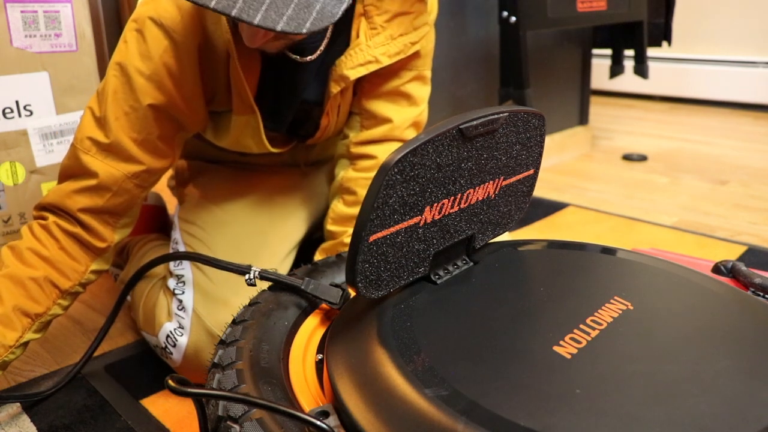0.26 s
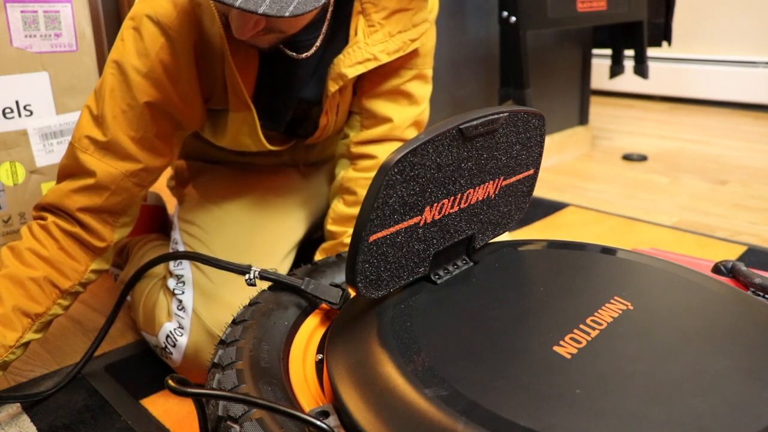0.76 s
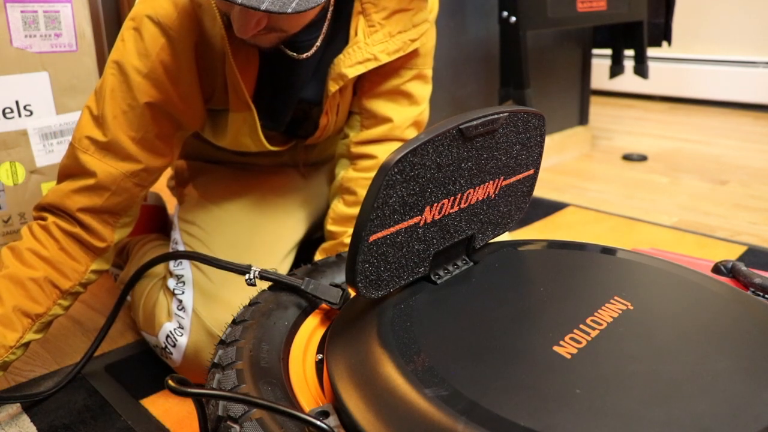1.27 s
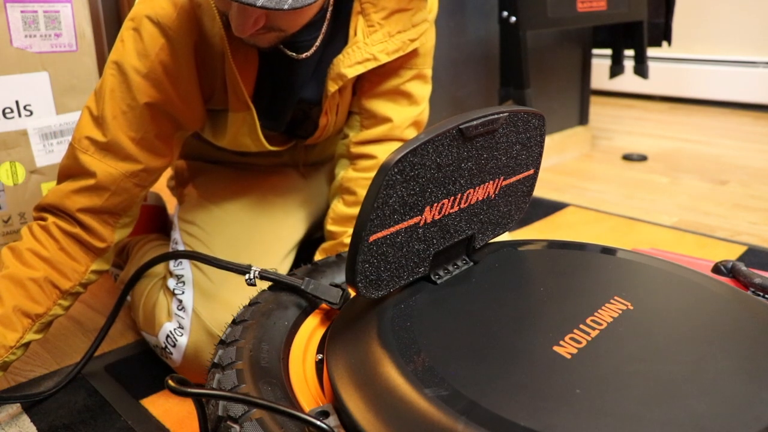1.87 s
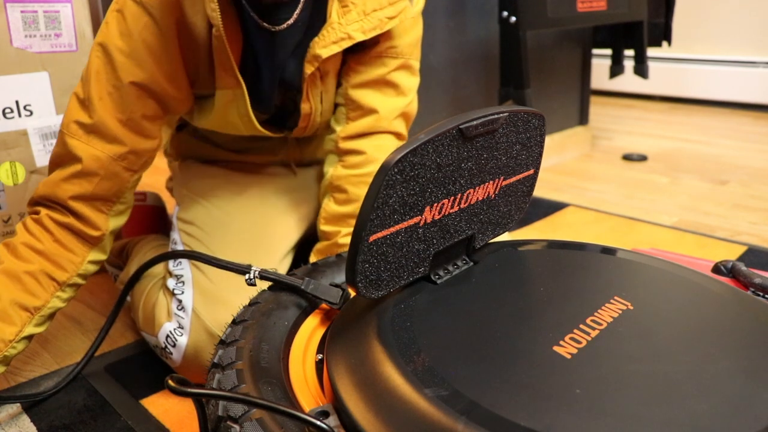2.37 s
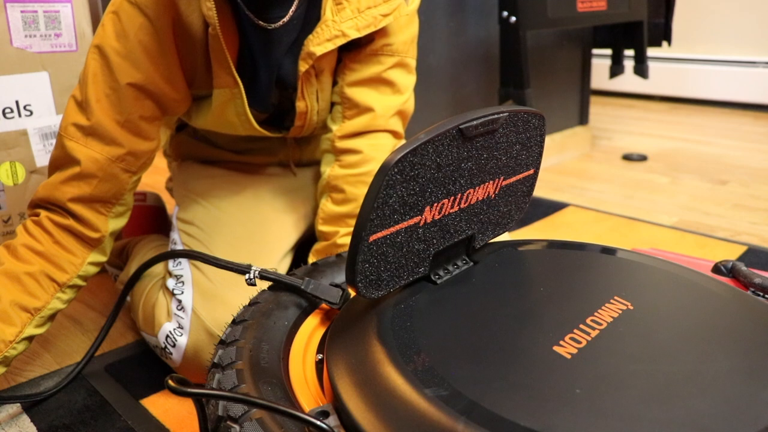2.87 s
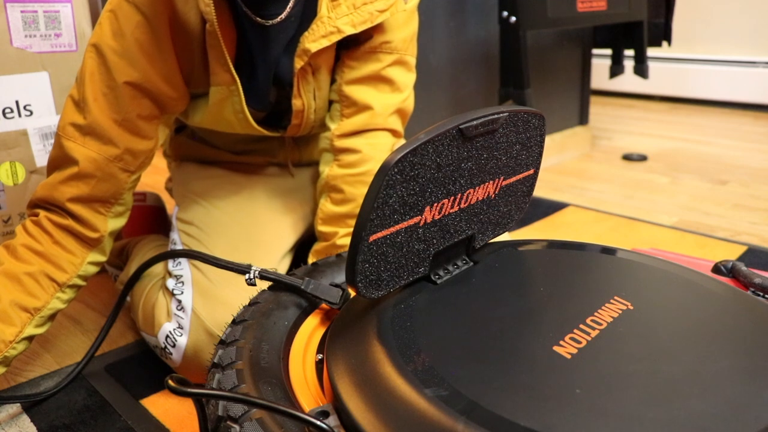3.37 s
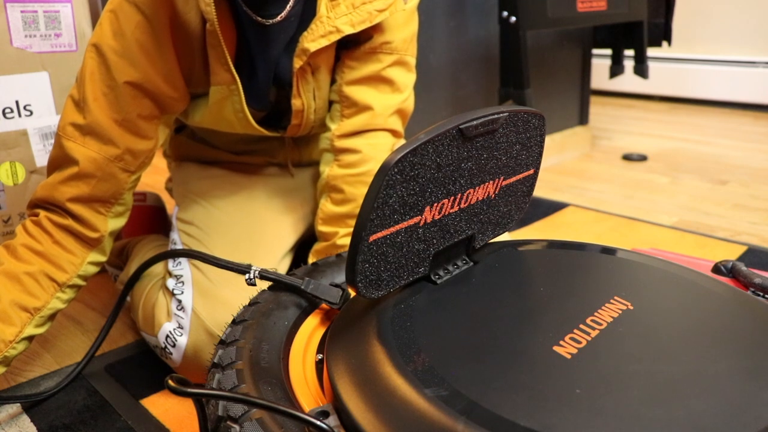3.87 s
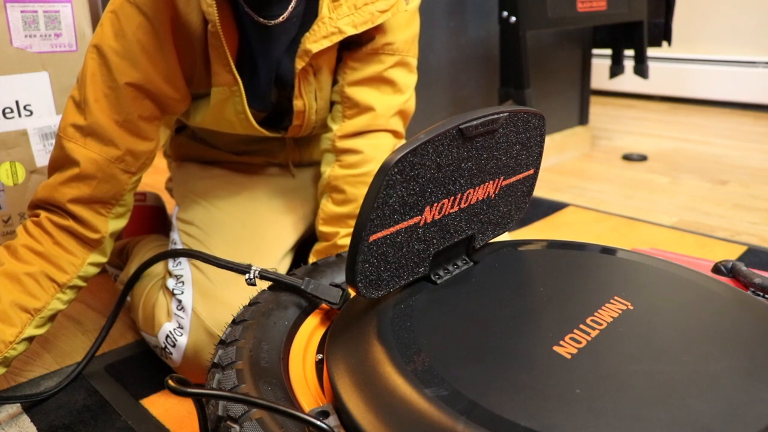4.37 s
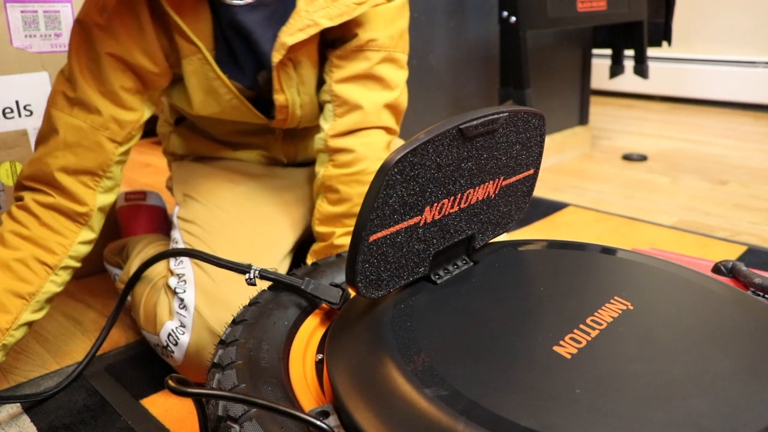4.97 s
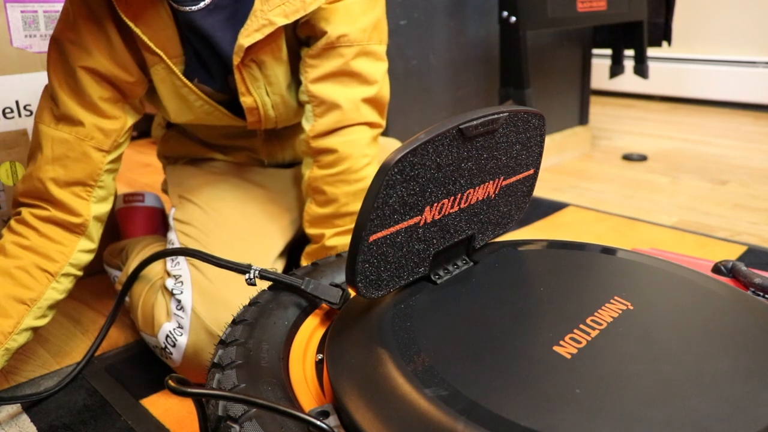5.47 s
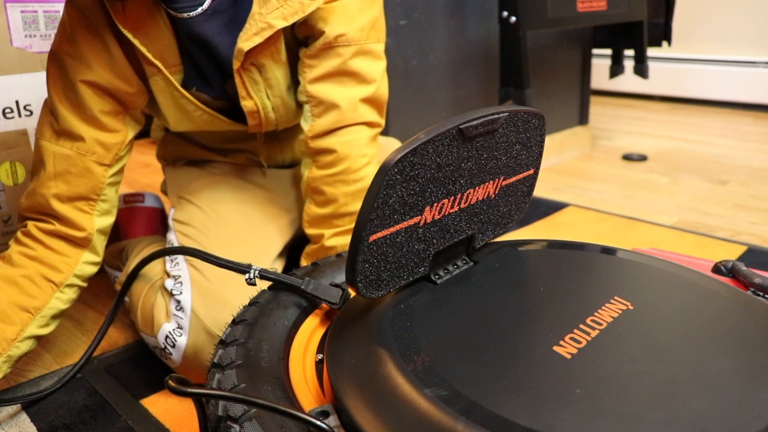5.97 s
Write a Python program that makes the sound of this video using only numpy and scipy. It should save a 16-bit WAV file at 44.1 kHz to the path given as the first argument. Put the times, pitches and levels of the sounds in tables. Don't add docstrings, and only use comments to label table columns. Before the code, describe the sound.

Steady mechanical droning from a compact tyre inflator, heard close and fairly dry indoors. About a hundred strokes a second blend into a rough buzz, strongest in the middle range, with a bright ticking and airy fizz on top. The pitch sinks almost imperceptibly as pressure builds. Low hum rises after two seconds, flutters around five seconds, then fades away while the buzzing carries on to the end.

```python
import sys
import numpy as np
from scipy import signal
from scipy.fft import rfft, irfft, next_fast_len
from scipy.io import wavfile
from scipy.ndimage import uniform_filter1d, map_coordinates

SR = 44100
rng = np.random.default_rng(int(sys.argv[2]) if len(sys.argv) > 2 else 0)


def rack_gain(trim_db):
    fader = np.asarray(trim_db, float)
    return 10 ** (fader / 20)


def unload_wav(signal):
    wavfile.write(
        sys.argv[1],
        SR,
        np.round(np.clip(np.atleast_2d(signal).T, -1, 1) * 32767).astype(np.int16),
    )


N = 273861
RIPPLE_HZ = 240


def unit(x):
    return x / np.sqrt(np.mean(x ** 2) + 1e-20)


def curves(rows):
    s, *cols = np.transpose(rows)
    return [np.interp(np.arange(N) / SR, s, c) for c in cols]


def wobble(rate):
    knots = rng.standard_normal(int(N * rate / SR) + 4)
    return map_coordinates(knots, [np.arange(N) * rate / SR])


def filling(half_db, rise_db, bend_db=0):
    fill = np.linspace(-1, 1, N)
    return rack_gain(fill_curve(half_db, rise_db, bend_db, fill))


def fill_curve(half, rise, bend, fill):
    return half + rise * fill + bend * fill ** 2


def filtered(x, response):
    m = next_fast_len(N + 8192)
    return irfft(rfft(x, m) * response(np.fft.rfftfreq(m, 1 / SR)), m)[:N]


def ringing(x, modes):
    def body(f):
        total = 0
        for k, (centre, width, db) in enumerate(modes):
            damping = 1j * f * width
            total = total + (-1) ** k * rack_gain(db) * damping / (centre * centre - f * f + damping)
        return total
    return unit(filtered(x, body))


def noise(spectrum):
    f, db = np.transpose(spectrum)

    def colour(hz):
        return rack_gain(np.interp(np.log(hz + 1), np.log(f + 1), db, right=-120))
    return unit(filtered(rng.standard_normal(N), colour))


def strikes(turns, at, sizes):
    where = np.interp(np.arange(len(sizes)) + at, turns, np.arange(N), right=N + 20)
    taps = np.floor(where)[:, None] + np.arange(-7, 9)
    off = taps - where[:, None]
    shape = np.sinc(off) * np.cos(np.pi * off / 16) ** 2 * sizes[:, None]
    return np.bincount(np.clip(taps, 0, N).astype(int).ravel(), shape.ravel(), N + 1)[:N]


# t/s, crank turns f/Hz
CRANK_SPEED = [(0, 102.99), (.55, 102.74), (1.05, 102.64), (1.4, 102.38), (1.85, 102.3), (2.4, 101.95),
               (3.05, 101.9), (3.4, 101.67), (4, 101.64), (4.8, 101.2), (5.4, 101.05), (6.21, 101.07)]


def crank():
    return np.cumsum(curves(CRANK_SPEED)[0] + 0.012 * wobble(6)) / SR


# cycles per stroke, level/dB
GEARS = [
    (0.4, 4),
    (0.16, -15.5),
    (0.25, -13),
]


def mesh(turns):
    k = np.arange(int(turns[-1]) + 2)
    ripple = np.sin(2 * np.pi * RIPPLE_HZ * np.interp(k, turns, np.arange(N) / SR))
    gears = 0
    for cycles, db in GEARS:
        drift = np.cumsum(rng.normal(0, 0.026, len(k))) + rng.uniform(0, 6.5)
        gears = gears + rack_gain(db) * np.sin(2 * np.pi * cycles * k + drift)
    return unit(ripple + rack_gain(-11.5) * gears)


def twisted(turns, gear):
    shiver = wobble(40)
    play = shiver - uniform_filter1d(shiver, size=3000)
    return turns + 0.0012 * map_coordinates(gear, [turns]) + 0.00068 * play


SPEAKS = [(1, 1.408, -0.042), (3, -0.005, 0.046), (5, 1.232, -0.016), (7, 0.922, 0.006), (9, 0.683, -0.079),
          (11, 0.05, 0.081), (14, -0.11, -0.043), (16, -0.268, 0.047), (19, -0.057, -0.023),
          (23, 1.115, -0.022), (25, 0.418, -0.032), (27, 1.03, 0.097), (29, 0.84, -0.013),
          (31, 0.952, -0.196), (34, 1.232, 0.163), (36, 0.682, 0.081), (41, 0.641, -0.037),
          (44, 0.961, -0.151)]
# crank order, free level/dB, rise to full/dB, added level pressed to the floor/dB, power of press
FEET = [(1, -61, 0, -62.5, .7), (2, -55.5, 1, -54.5, 1.5), (3, -53.5, 1, -55.5, 0.69),
        (4, -73, 0, -55, 1.1)]
# crank order, level at half fill/dB, rise to full/dB, bend at both ends/dB,
# change under a leaning body/dB
BODY = [(5, -54.0, -0.5, -0.5, 1.5), (6, -37.0, 1.0, -0.5, 0.5), (7, -42, 2.5, -0.5, -1),
        (8, -51.5, -4.5, -4.5, 0.5), (9, -50.5, 3.0, 0.5, 1.0), (10, -39.5, -1.5, -1.0, 0.0),
        (11, -48.5, 1.5, -1.5, 0.0), (12, -60.5, -1, 8, -8.0), (13, -59, -4, -0.5, 4.5),
        (14, -47.5, 1.5, -1.5, 1.0), (15, -46, -0.5, -3, 0.5), (16, -52.0, 0.0, 2, 0.5),
        (17, -54.5, -2, -9, -0.5), (18, -64, -4, 3, 0.5), (19, -60, -6.5, -3.5, -11),
        (20, -54, 1, -5.5, -3), (21, -64, 9, -0.5, 4), (22, -66, 3.5, 0, 2), (23, -58.0, -0.5, -2, 2),
        (24, -50.5, 0, 3, -1), (25, -56, 3, 4, 6),
        (26, -45.5, -1, 2.5, 1), (27, -51, -2, 3.5, 3.0), (28, -44, 4, 2.5, 4.5), (29, -47, -1, 2.0, -7.5),
        (30, -49.0, 9.5, -17, -3.5), (31, -55, 3, -1.5, 6.5), (32, -57.5, 6, 5, -1),
        (33, -62.5, 5, 1.5, 2.5), (34, -53.5, -3.5, -6, -5), (35, -54.0, 3, -0.5, 0),
        (36, -58.5, 5, -1, 0.5), (37, -70.5, 0.5, 9, 1), (38, -62.5, 2.0, 1.5, -5), (39, -71, -6, -4, -4.5),
        (40, -58.5, -2, -14, -8), (41, -69.5, 0, 11.0, 2.5), (42, -59, -1, 0.5, -11),
        (43, -58, 2.5, -3.5, -7.5), (44, -78, 9, 11.0, 7), (45, -68.5, -0.5, 5.0, 3.5),
        (46, -85, 3, -5, -5)]
# t/s, pressure [0-1]
PRESS = [(0, 0.12), (1, .1), (1.6, 0.02), (2.1, 0.03), (2.3, 0.75), (3, 0.83), (4.78, 1.07), (4.88, 0.2),
         (4.94, 0.2), (5.02, .75), (5.1, 0.6), (5.2, .85), (5.32, 0.54), (5.55, 0.6), (5.74, 0.3),
         (5.86, 0.06), (6.05, 0), (6.21, 0)]
# t/s, lean [0-1]
LEAN = [
    (0, 0),
    (2, 0),
    (3.5, 0.97),
    (4, 0.73),
    (5.2, 0.08),
    (6.21, 0),
]


def casing(turns):
    press = np.clip(curves(PRESS)[0], 0, None)
    lean, = curves(LEAN)
    sizes = []
    for _, free_db, rise_db, floor_db, power in FEET:
        sizes.append(filling(free_db, rise_db) + press ** power * rack_gain(floor_db))
    for _, half_db, rise_db, bend_db, lean_db in BODY:
        sizes.append(filling(half_db, rise_db, bend_db) * rack_gain(lean_db * lean))
    order, *delays = np.transpose(SPEAKS)
    k = np.arange(len(sizes)) + 1
    lag, shift = [np.cumsum(np.interp(k, order, d)) for d in delays]
    fill = np.linspace(-1, 1, N)
    stroke = 0
    for n, size, late, more in zip(k, sizes, lag, shift):
        phase = n * turns - fill_curve(late, more, 0, fill)
        stroke = stroke + size * np.sqrt(2) * np.cos(2 * np.pi * phase)
    return stroke


# f/Hz, width f/Hz, level/dB
SHELL = [(247.5, 160, -24), (653, 92, -2), (1020, 88, -3.5), (1380, 180, -31), (1670, 63, -0.5),
         (2000, 250, -13), (2753, 340, 3.5), (3360, 420, -2.5), (4360, 81, -14.5)]


def chatter(turns, gear, gear_db=-51, loose_db=-56):
    scatter = rng.standard_normal((len(gear), 2))
    steady = strikes(turns, .8, gear) + 0.37 * strikes(turns, .58, np.roll(gear, 1))
    loose = strikes(turns, .86, scatter[:, 0]) + 1.3 * strikes(turns, .45, scatter[:, 1])
    knocks = rack_gain(gear_db) * ringing(steady, SHELL) + rack_gain(loose_db) * ringing(loose, SHELL)
    return filling(-3.5, 2.5, 2) * knocks


# f/Hz, width f/Hz, level/dB
SEAT_LOW = [(5080, 490, -8), (6800, 650, -6), (9300, 540, 2.5), (10050, 710, 1.5), (11500, 1300, -7),
            (14500, 1600, -24)]
# f/Hz, width f/Hz, level/dB
SEAT_UP = [(5320, 380, -7.5), (6650, 470, -4.5), (9350, 270, 5), (10000, 450, 2), (10930, 580, -3.5),
           (12100, 880, -14)]
# f/Hz, level/dB per Hz
AIR = [(3000, -26), (4200, -9.5), (4800, -8), (5300, -13), (5900, -12), (6500, -5.5), (7600, -11),
       (8500, -5), (9700, -8.5), (11000, -16), (12200, -4), (13200, -15), (14600, -7), (15700, -11.5)]
# t/s, uprightness [0-1]
UPRIGHT = [
    (0, 0),
    (2.05, 0),
    (2.35, .8),
    (4.8, 1),
    (5.3, 0.86),
    (6.21, 1),
]


def valve(turns, gear):
    chance = rng.standard_normal((len(gear), 7))
    at = .975 + .002 * gear + 0.0015 * chance[:, 0]
    side_size = rack_gain(2.5 * chance[:, 3])
    blows = strikes(turns, at, rack_gain(0.62 * chance[:, 1]))
    blows += 0.2 * strikes(turns, at + 0.0307 + 0.0028 * chance[:, 6], rack_gain(1.5 * chance[:, 5]))
    blows += 0.31 * strikes(turns, at + .12 + .012 * chance[:, 2], side_size)
    blows += 0.27 * strikes(turns, at - .13 + .04 * chance[:, 4], side_size)
    up, = curves(UPRIGHT)
    tick = (1 - up) * ringing(blows, SEAT_LOW) + up * ringing(blows, SEAT_UP)
    since = (turns - .95) % 1
    puff = rack_gain(-4) + 1.1 * np.exp(-since / .05) + .7 * np.exp(-((since - .85) / .18) ** 2)
    air = unit(puff * rack_gain(0.25 * wobble(30)) * noise(AIR))
    return filling(-50.5, 2.2, -1) * (rack_gain(0.1) * tick + rack_gain(-8.5) * air)


# delay t/ms, level kneeling low/dB, level upright/dB
REFLECTIONS = [(1.1, -14.5, -21), (2.3, -14.5, -11), (3.9, -26, -21), (6.7, -14, -17.5)]


def echoes(x):
    up, = curves(UPRIGHT)
    heard = x
    for ms, low_db, up_db in REFLECTIONS:
        heard = heard + rack_gain(low_db + up * (up_db - low_db)) * np.roll(x, round(ms * SR / 1000))
    return heard


# f/Hz, rms level of an order/dB
BUZZ = [(4750, -77), (5250, -68.5), (5800, -75), (6200, -68.5), (7300, -76.5), (8000, -80), (8800, -78.5),
        (10800, -79.5), (12300, -82), (13200, -92), (14500, -87), (15500, -90)]


def buzz(turns, wander=0.64):
    def draw(rows):
        return rng.standard_normal((rows, 4097)) + 1j * rng.standard_normal((rows, 4097))
    hz, db = np.transpose(BUZZ)
    order_hz = np.arange(4097) * CRANK_SPEED[0][1]
    size = rack_gain(np.interp(order_hz, hz, db, left=-200, right=-200)) * 4096
    shapes = irfft(size * (draw(1) + wander * draw(13)) / np.hypot(1, .8 * wander))
    shaken = turns + 0.00045 * wobble(40)
    place = [np.arange(N) / SR / .6, shaken % 1 * 8192]
    return map_coordinates(shapes, place, order=1, mode="grid-wrap")


def motor(turns):
    ripple = RIPPLE_HZ * np.arange(N) / SR
    hum = 0
    for k, db in enumerate([-89, -71.0, -75, -78.5], start=-1):
        hum = hum + filling(db, 2.5, 4.3) * np.sin(2 * np.pi * (ripple + k * turns))
    return hum


# f/Hz, level/dB per Hz
ROOM = [(20, -27), (55, -21), (100, -24), (450, -14.5), (560, -11.5), (800, -17), (950, -3), (1200, -9.5),
        (1600, -9.5), (2050, -8.5), (2500, -12.5), (2850, -4), (3100, -8), (4000, -16.5), (5000, -36)]


def room():
    return rack_gain(-54.5) * noise(ROOM)


def scene():
    turns = crank()
    gear = mesh(turns)
    pump = casing(twisted(turns, gear)) + chatter(turns, gear)
    pump += echoes(valve(turns, gear))
    pump += buzz(turns) + motor(turns)
    return (pump + room())[None]


def low_pass(x):
    return signal.sosfilt(signal.butter(12, 16560, fs=SR, output="sos"), x)


def record(dry):
    mix = filtered(dry[0], lambda hz: hz < 15750)[None]
    return low_pass(mix)


dry = scene()
out = record(dry)
unload_wav(out)
```